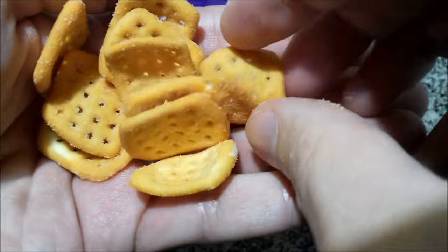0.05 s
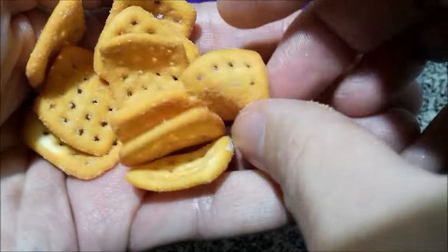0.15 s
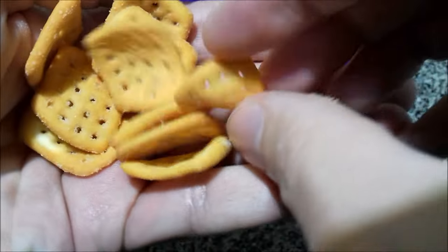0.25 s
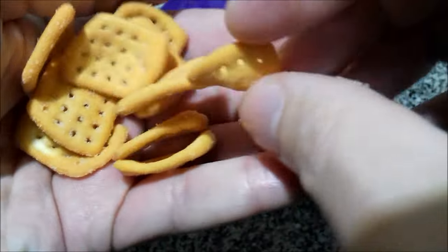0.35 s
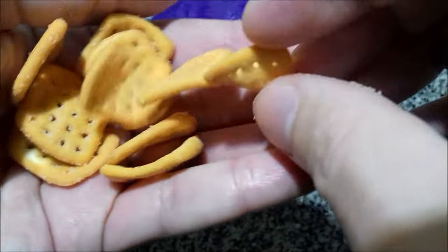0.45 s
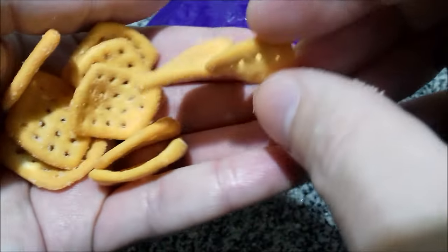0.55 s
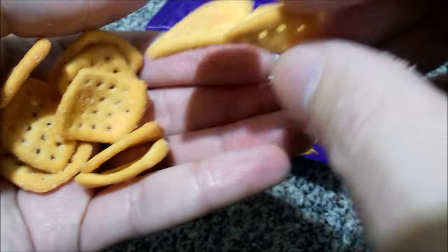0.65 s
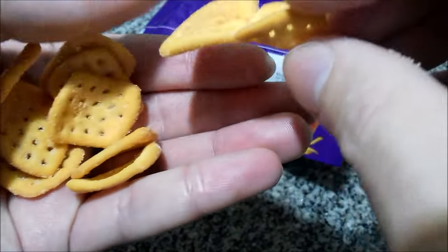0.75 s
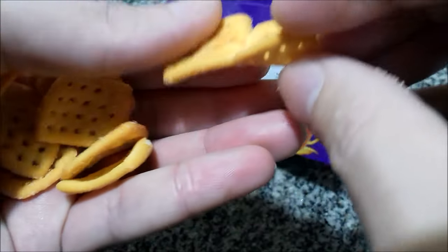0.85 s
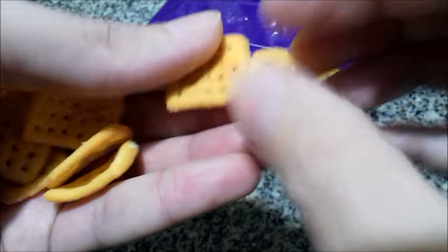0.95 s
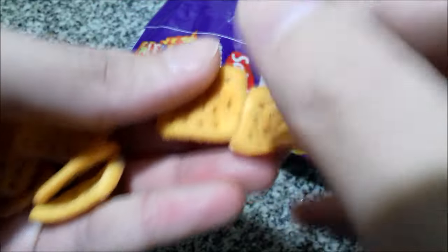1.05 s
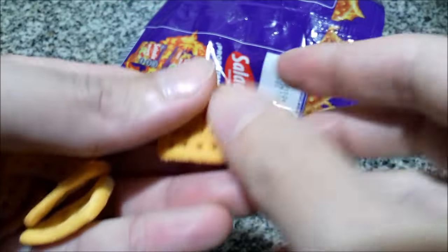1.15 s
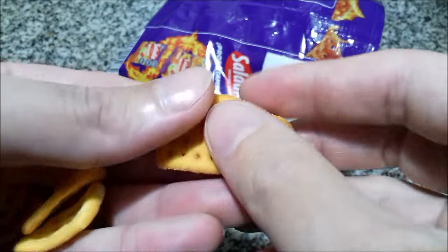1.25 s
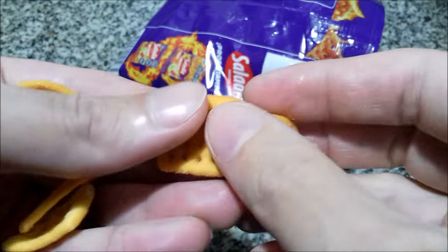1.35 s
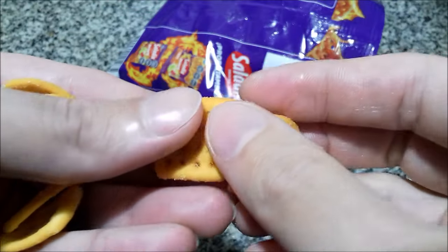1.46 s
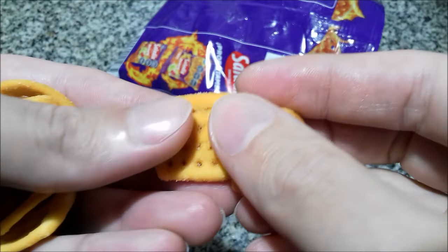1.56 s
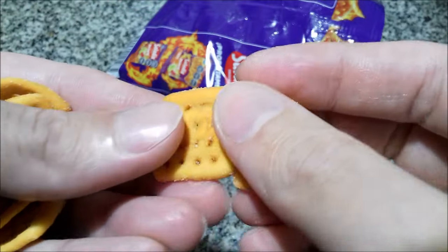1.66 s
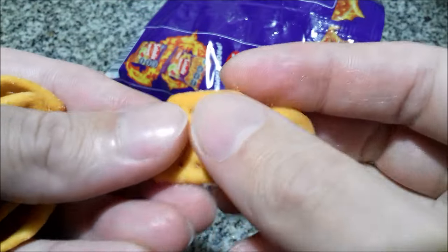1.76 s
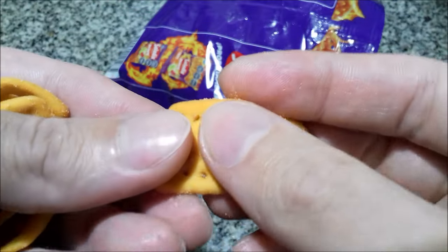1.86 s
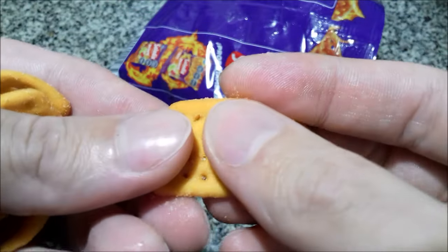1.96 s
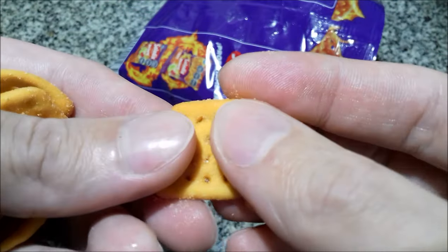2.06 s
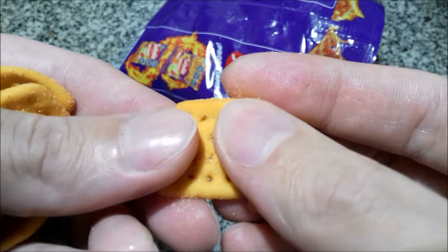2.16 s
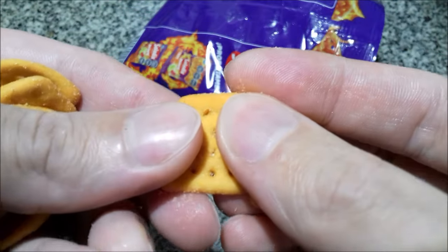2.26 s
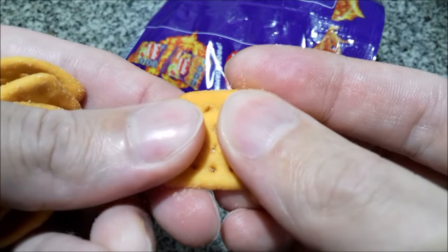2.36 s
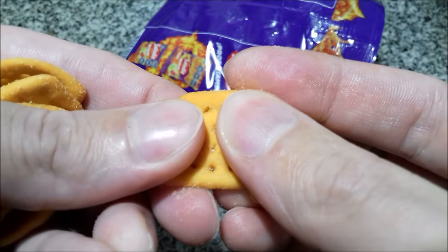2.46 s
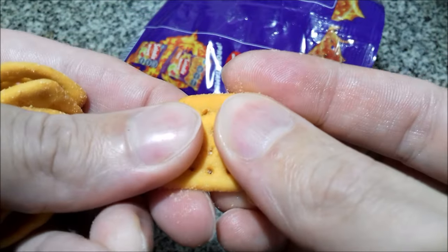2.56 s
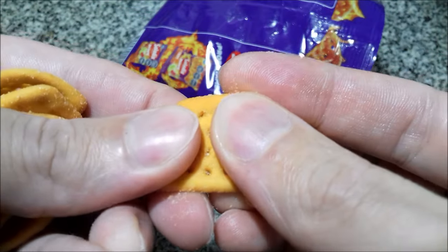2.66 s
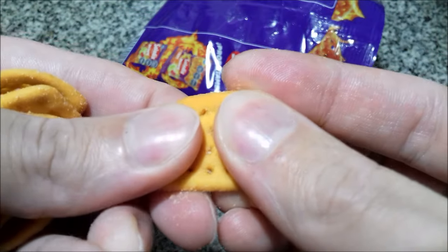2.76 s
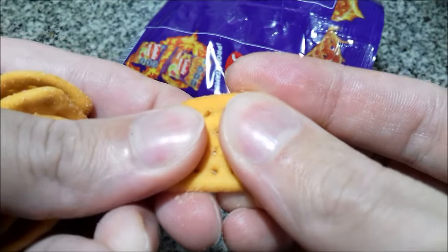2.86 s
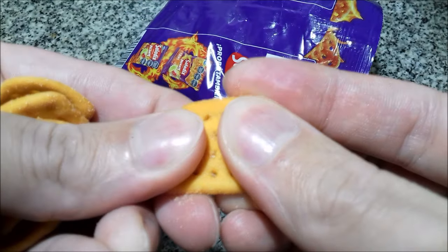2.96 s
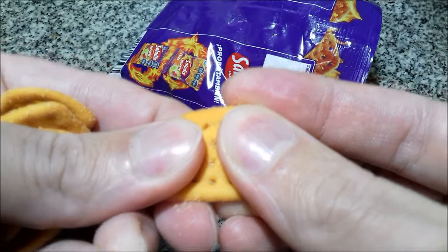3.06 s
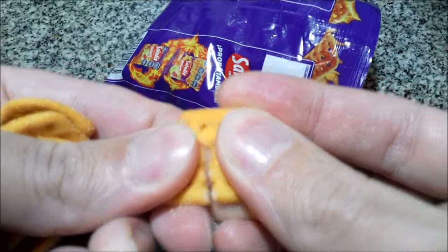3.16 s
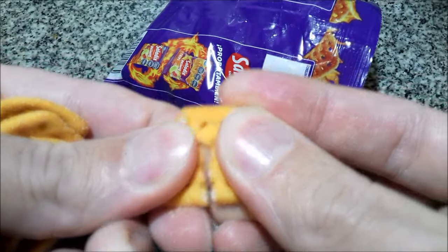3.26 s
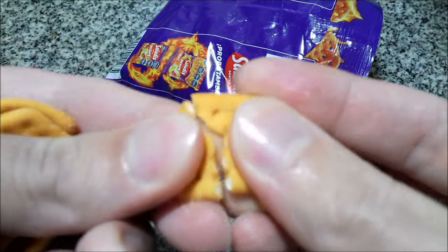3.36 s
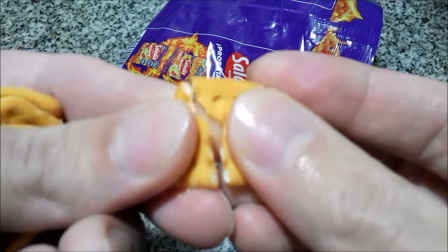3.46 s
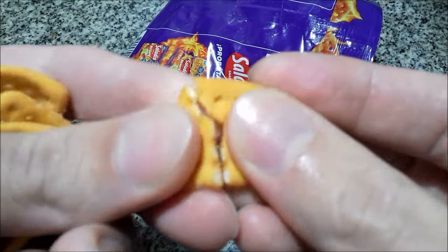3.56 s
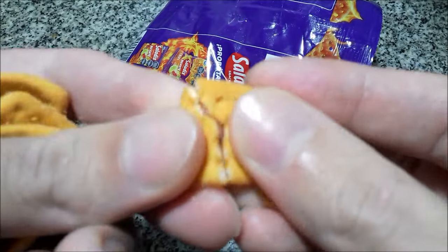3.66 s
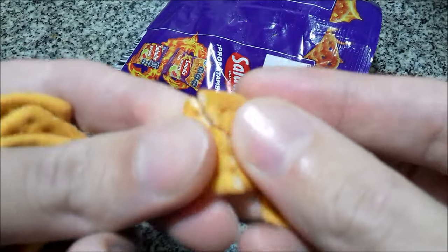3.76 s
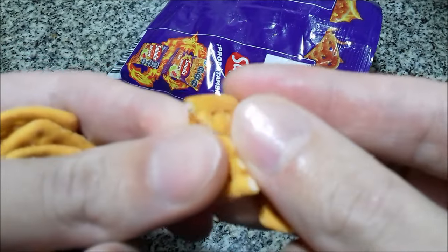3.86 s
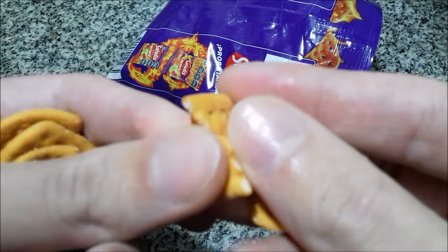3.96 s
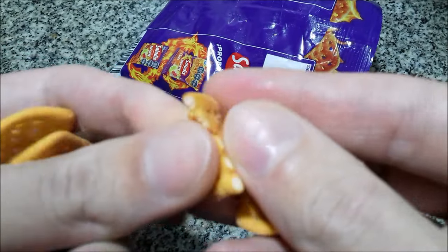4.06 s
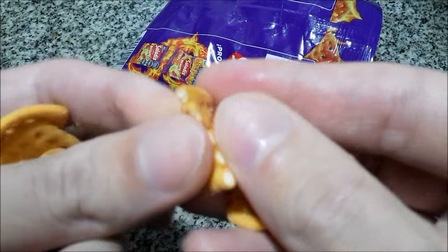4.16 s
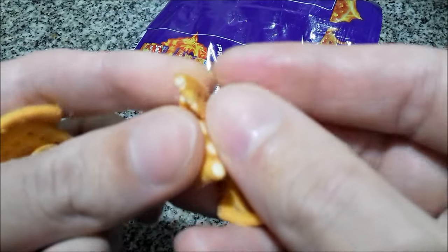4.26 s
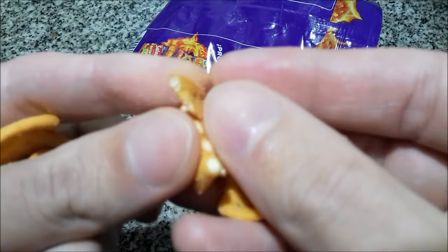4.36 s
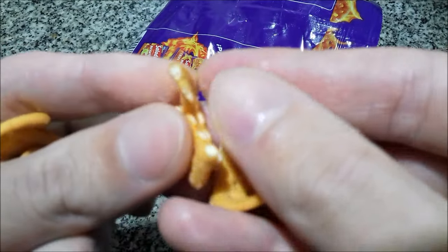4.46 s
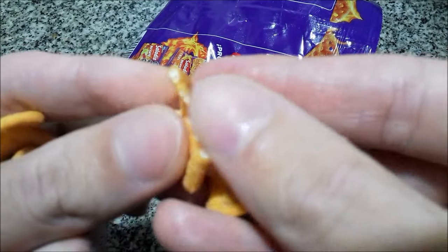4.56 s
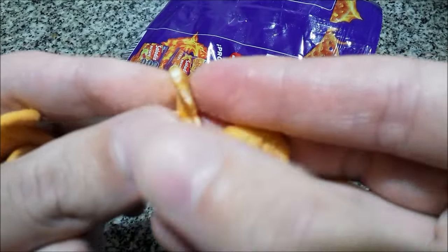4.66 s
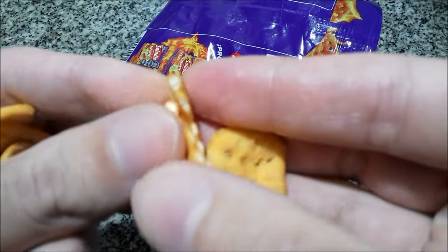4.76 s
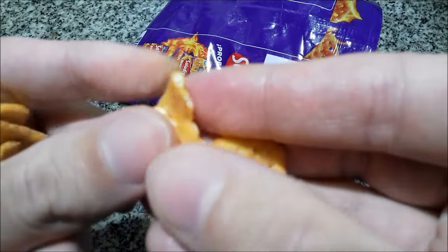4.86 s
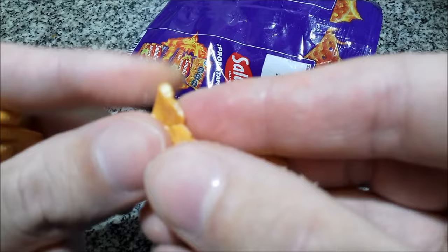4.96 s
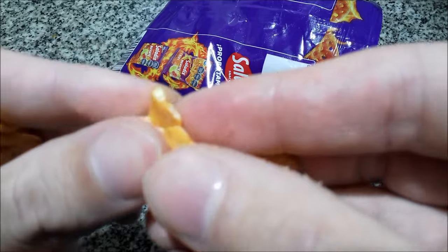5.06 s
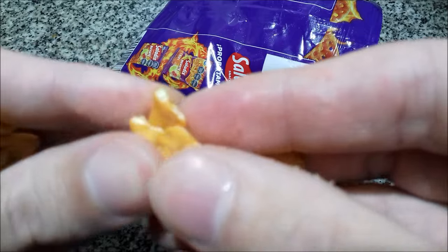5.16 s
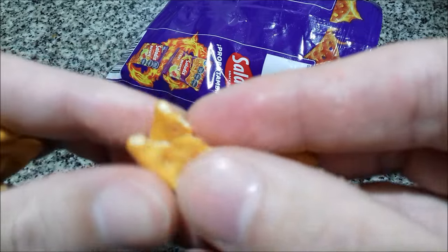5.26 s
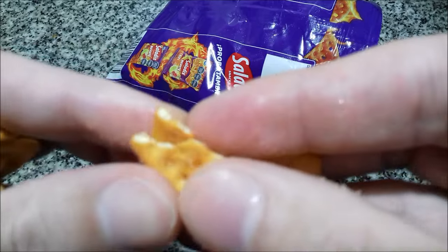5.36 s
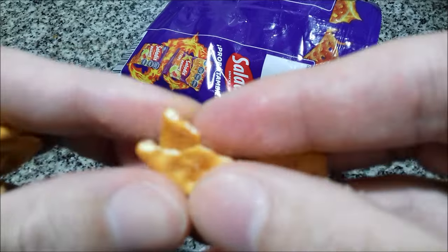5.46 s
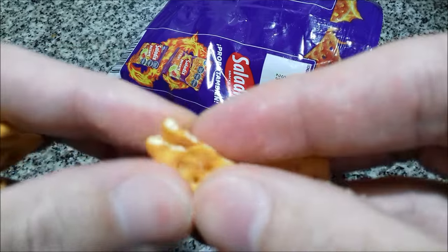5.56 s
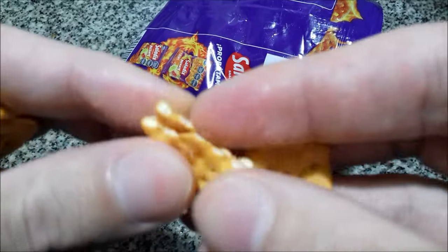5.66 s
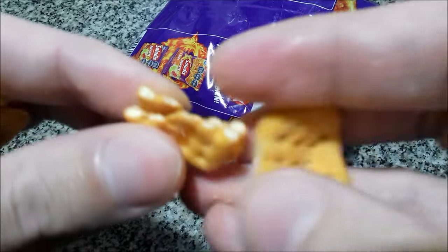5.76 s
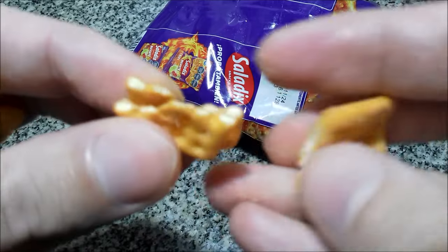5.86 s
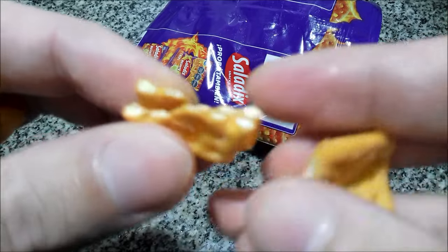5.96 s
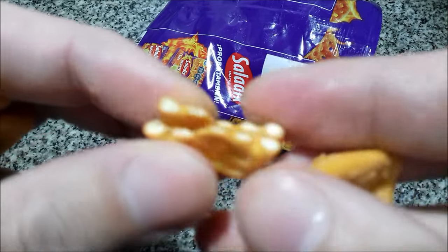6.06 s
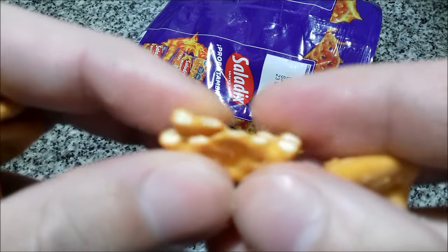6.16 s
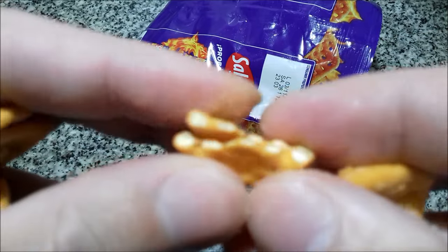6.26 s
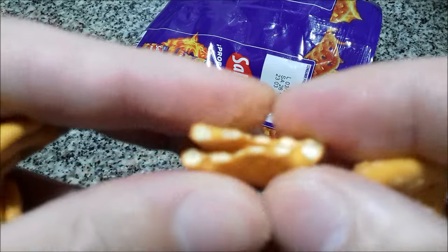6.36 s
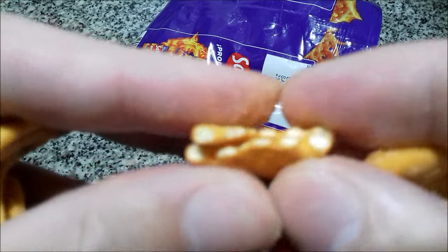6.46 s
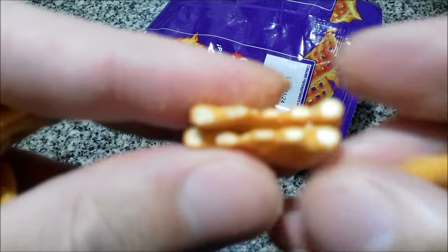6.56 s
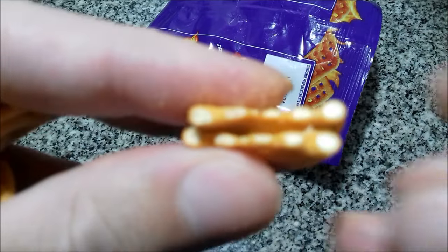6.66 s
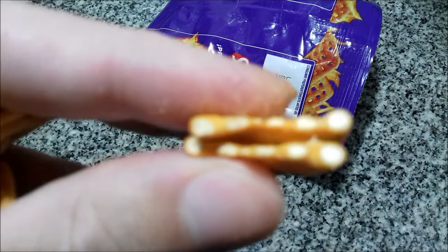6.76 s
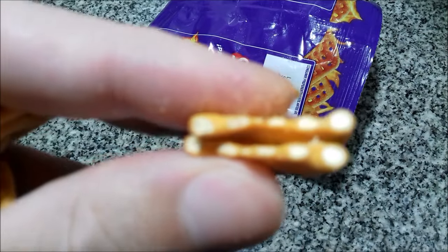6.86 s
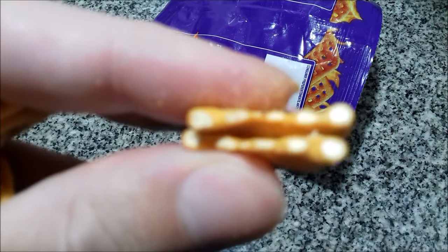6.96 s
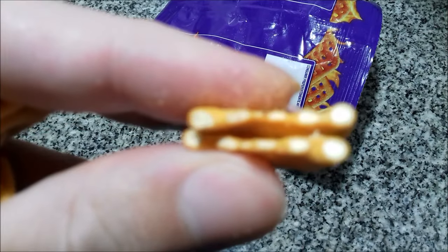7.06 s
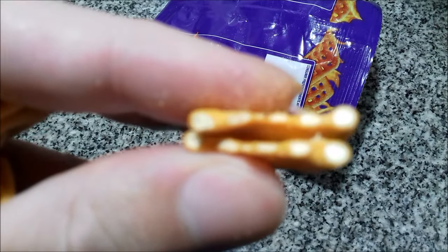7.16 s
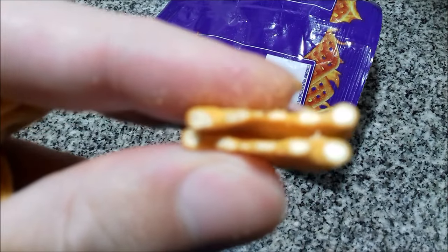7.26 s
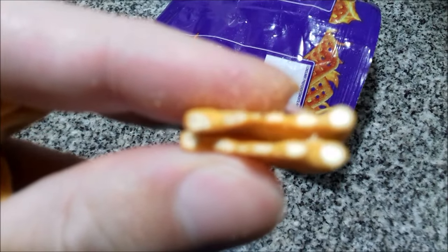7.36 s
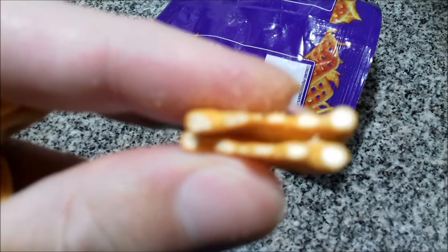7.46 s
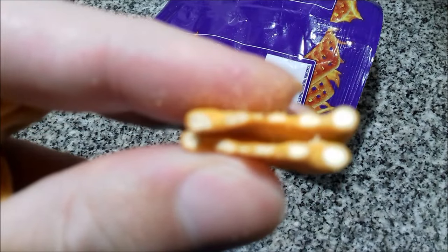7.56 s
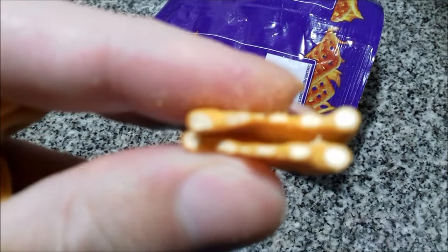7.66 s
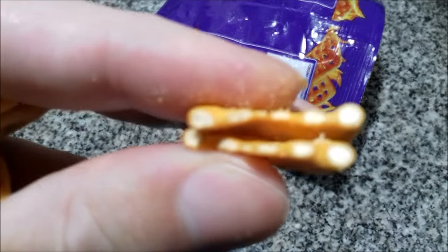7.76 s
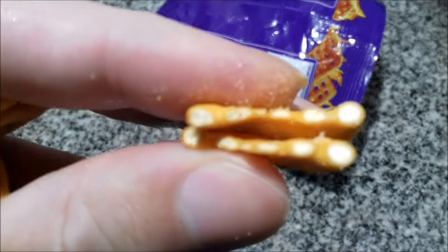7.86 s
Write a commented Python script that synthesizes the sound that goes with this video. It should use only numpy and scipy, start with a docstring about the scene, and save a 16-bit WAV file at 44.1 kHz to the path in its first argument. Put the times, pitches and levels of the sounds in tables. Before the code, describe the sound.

A dry cracker is rubbed between fingers, snaps once loudly, then crumbles in small crackles and ticks over a faint refrigerator hum and whine.

```python
"""A small hard kitchen: fingers pick up, snap and crumble a dry cracker close to a small camera microphone.
Each snap is a quick run of tiny random fractures; rubbed crumbs are dense clicks, filtered by crumb size.
The walls answer both with decaying noise tails. Behind, a refrigerator compressor hums and whines as
wavering sines, faint chirps swell in a narrow band of noise, and shaped noise gives the room air and
the hiss of the two channels."""
import sys
import numpy as np
from scipy import signal
from scipy.fft import rfft, irfft, next_fast_len
from scipy.io import wavfile
from scipy.ndimage import map_coordinates

SR = 44100
rng = np.random.default_rng(int(sys.argv[2]) if len(sys.argv) > 2 else 0)


def dump(signal):
    """Clip the signal to [-1, 1] and save it as 16-bit WAV at the path in sys.argv[1]."""
    limited = np.clip(np.atleast_2d(signal).T, -1, 1)
    pcm = np.round(limited * 32767).astype(np.int16)
    wavfile.write(sys.argv[1], SR, pcm)


N = 348390


def amp(db):
    """Amplitude factor of a level in dB."""
    return 10 ** (np.asarray(db) / 20)


def unit(x):
    """x scaled to an rms of 1."""
    return x / np.sqrt(np.mean(x ** 2) + 1e-20)


def along(points, hz):
    """Interpolate (f/Hz, value) points on a log frequency axis."""
    f, v = np.transpose(points)
    return np.interp(np.log(hz + 1), np.log(f + 1), v)


def curves(rows):
    """One value per sample for each column after the time."""
    times, *columns = np.transpose(rows)
    return [np.interp(np.arange(N) / SR, times, column) for column in columns]


def wobble(rate):
    """A smooth random curve, rate knots a second."""
    knots = rng.standard_normal(int(N * rate / SR) + 4)
    return map_coordinates(knots, [np.arange(N) * rate / SR])


def filtered(x, gain):
    """x times a gain that depends on frequency."""
    m = next_fast_len(N + 8192)  # zeros behind the sound keep its end off its start
    spectrum = rfft(x, m) * gain(np.fft.rfftfreq(m, 1 / SR))
    return irfft(spectrum, m)[..., :N]


def impulse(db_at, size=1024):
    """The causal response with gain db_at(Hz), by folding the cepstrum."""
    log_gain = db_at(np.fft.rfftfreq(size, 1 / SR)) * np.log(10) / 20
    cepstrum = irfft(log_gain, size)
    cepstrum[1:size // 2] *= 2
    cepstrum[size // 2 + 1:] = 0
    return irfft(np.exp(rfft(cepstrum)), size)


def shelf(hz, edge_hz):
    """A smooth step over frequency: 0 below the edge, 1 above it."""
    return 1 / (1 + (edge_hz / (hz + 1)) ** 8)


def air():
    """Steady room noise, alike in both channels, plus a weaker hiss of opposite sign in the two."""
    # spectrum of the room air: f/Hz, relative level/dB per Hz
    air_shape = [(12, -35), (20, -13.5), (70, -19.5), (105, -5), (200, -10.5), (500, -9.5), (1150, -15),
                 (1500, -10), (2000, -15.5), (2400, -24), (2900, -11.5), (3800, -17), (4540, -10),
                 (5300, -29), (9000, -32), (16000, -33.5)]
    # spectrum of the noise that differs between the channels: f/Hz, relative level/dB per Hz
    hiss_shape = [(35, -43), (60, -6), (256, -3.5), (803, -5.5), (1010, -5), (4030, -10), (16000, -21)]
    both, apart = rng.standard_normal((2, N))
    both = amp(-64.5) * unit(filtered(both, lambda hz: amp(along(air_shape, hz))))
    apart = amp(-72) * unit(filtered(apart, lambda hz: amp(along(hiss_shape, hz))))
    return np.array([both + apart, both - apart])


def compressor():
    """Hum and whine: sines on multiples of the shaft rate, each wavering a little in level."""
    # steady tones: multiple of the shaft rate, level/dB rms before the wavering
    hum_tones = [(2, -87), (3, -83), (6, -86), (7, -79), (8, -86), (10, -87), (11, -74), (59, -80),
                 (85, -81), (86, -84), (91, -83), (92, -85), (94, -83), (95, -83), (96, -78)]
    # the 93rd multiple swells and fades: t/s, level/dB rms before the wavering
    whine_level = [(0, -61.5), (.75, -65), (1.1, -71.5), (1.9, -73.5), (2.2, -67), (3.6, -71), (4.6, -65),
                   (5.3, -69), (6.1, -69), (6.6, -66), (7, -61.5), (7.2, -65.5), (7.5, -58.5),
                   (7.75, -72.5), (7.9, -63.5)]
    shaft_hz = 49.028
    turn = 2 * np.pi * shaft_hz * np.arange(N) / SR

    def tone(order):
        """A sine of rms 1 from a random phase."""
        return np.sqrt(2) * np.sin(order * turn + 2 * np.pi * rng.random())

    hum = sum(amp(db + .8 * wobble(3)) * tone(order) for order, db in hum_tones)
    whine_db = curves(whine_level)[0] + 2.2 * wobble(9)
    return hum + amp(whine_db) * tone(93)


def chirps():
    """A narrow band of noise near 2.9 kHz that murmurs all along and swells now and then for some 50 ms."""
    # faint short chirps: t/s of the middle, level/dB rms added to the murmur
    swells = [(1.81, -62.5), (1.92, -65), (2.3, -65), (4.55, -62.5), (5.53, -71), (6.58, -61), (6.87, -67),
              (7.32, -69), (7.42, -66.5), (7.66, -67)]
    t = np.arange(N) / SR
    murmur_db = -80 + 3 * wobble(14)
    level = amp(murmur_db) + sum(amp(db) * np.exp(-((t - s) / 0.026) ** 2) for s, db in swells)
    band = filtered(rng.standard_normal(N), lambda hz: 1 / (1 + ((hz - 2930) / 90) ** 2))
    return level * unit(band)


def ringing(hz):
    """The lift in dB that the modes of the piece give: the cracker rings faintly."""
    # modes: f/Hz, half width/Hz, lift/dB
    modes = [(2018, 100, 9), (5873, 45, 8), (6560, 130, 4.5), (9470, 340, 1.5), (11700, 210, 1)]
    return sum(db / (1 + ((hz - centre) / width) ** 2) for centre, width, db in modes)


def strokes():
    """Gains of body, middle and treble of the grit: each stroke rises, sags while it lasts and falls."""
    # the faint grit of simply holding the piece: t/s, level/dB
    grip = [(0, -72), (.8, -68.5), (1.3, -68.5), (1.85, -63.5), (2.3, -67.5), (3.0, -64.5), (4.25, -64.5),
            (5.2, -66.5), (5.6, -67.5), (6.4, -68), (6.9, -70.5), (7.9, -74)]
    # fingers over the crumbs: start t/s, length/s, level/dB, treble/dB, body/dB (the last two relative)
    finger_strokes = [(0, 0.046, -62.5, -2, -18), (0.19, 0.066, -61, -6, -9), (0.362, 0.13, -56, 1, -9),
                      (0.566, 0.1, -62.5, 0, -2), (1.057, .04, -63.5, 5, 1), (1.178, 0.026, -60, 4, -4),
                      (1.326, .03, -60.5, -11, -4), (1.38, 0.032, -59, 4.5, -3), (1.475, 0.023, -68, 11, 6),
                      (2.103, 0.04, -66, -2, 4), (2.34, 0.36, -67, 3.5, 5.5),
                      (3.224, 0.26, -57.5, -4, -0.5), (3.55, 0.15, -55, 5.5, 4.5),
                      (3.845, 0.14, -54.5, 5, 3.5), (3.96, 0.073, -57.5, 7, -6),
                      (4.072, 0.11, -59.5, 8, 4.5), (4.42, 0.091, -74, 13, 4), (4.684, 0.03, -65.5, 5, -3),
                      (4.945, 0.066, -59, 4, -5), (5.043, 0.03, -65.5, 13, -3),
                      (5.083, 0.027, -57.5, 5.5, -9), (5.687, 0.06, -62.5, 7.5, -3),
                      (5.833, 0.054, -60, 4, -7), (5.934, .12, -65, 5, -3), (6.5, 0.11, -63, -3, 0)]
    grip_body_db, grip_treble_db = 1.5, -4
    rise, sag, fall = 450, 10.5, 230  # dB per s before, during and after a stroke
    t = np.arange(N) / SR
    gains = amp(curves(grip)[0] + np.array([[grip_body_db], [0], [grip_treble_db]]))
    for s, length, db, treble_db, body_db in finger_strokes:
        loss_db = rise * np.maximum(s - t, 0)
        loss_db += sag * np.clip(t - s, 0, length)
        loss_db += fall * np.maximum(t - s - length, 0)
        stroke = amp(db - loss_db) * amp([[body_db], [0], [treble_db]])
        gains = np.hypot(gains, stroke)  # powers add
    return gains


def rubbing(per_second=2000, spread_db=3.8):
    """Dense grit in clumps; crumbs of each size click on their own in their own range, so the colour shifts."""
    # spectrum of the crumbs: f/Hz, relative level/dB per Hz
    grit_shape = [(900, -47.5), (1700, -20.5), (2100, -18.5), (3700, -8), (4500, -0.5), (5200, -11.5),
                  (7300, -24), (10000, -31), (16000, -43)]
    # edges of the ranges of crumb sizes: f/Hz
    edges_hz = [1500, 2800, 3900, 5200, 6300, 7400, 8800, 10500, 17000]
    body, middle, treble = strokes()
    sizes = len(edges_hz) - 1
    hit = rng.random((sizes, N), np.float32) < per_second / SR
    # one slow clumping per size, and a faster one that all sizes share
    clumps_db = 2.4 * wobble(120) + 2.3 * np.array([wobble(25) for _ in range(sizes)])
    click_db = spread_db * rng.standard_normal((sizes, N), np.float32) + clumps_db
    clicks = hit * rng.standard_normal(N) * amp(click_db)
    colour = impulse(lambda hz: along(grit_shape, hz) + ringing(hz))
    grit = signal.fftconvolve(clicks, colour[None], axes=1)[:, :N]
    # each size keeps only the range between its two edges
    crumbs = filtered(grit, lambda hz: -np.diff([shelf(hz, edge) for edge in edges_hz], axis=0))
    crumbs /= np.std(crumbs.sum(axis=0))
    return body * crumbs[0] + middle * crumbs[1:4].sum(axis=0) + treble * crumbs[4:].sum(axis=0)


def kitchen(x, size=SR // 4):
    """Hard walls answer after a few ms; each frequency dies at its own speed, a new tail every quarter second."""
    # decay of the room: f/Hz, time to fall by 60 dB/s
    decay = [(400, 0.25), (900, 0.16), (1500, 0.19), (3400, 0.21), (4500, 0.24), (6000, 0.24),
             (12000, 0.29)]
    out = np.zeros(N + 4 * size)
    for start in range(0, N, size):
        hz, t, noise = signal.stft(rng.standard_normal(2 * size), SR, nperseg=256)
        fading = noise * amp(-60 * t / along(decay, hz)[:, None])
        tail = signal.istft(fading, SR, nperseg=256)[1]
        wet = signal.fftconvolve(x[start:start + size], tail / np.linalg.norm(tail))
        out[start + 250:][:len(wet)] += wet  # 250 samples: the way to the walls and back
    return out[:N]


def snaps(count=70):
    """Each snap is a crack front that jumps from cell to cell of the brittle dough: it starts fast and runs out."""
    # snaps and ticks: t/s, peak level/dB, treble/dB, body/dB, run length/ms (at least 1 is used)
    cracks = [(0.391, -44, -14, 0, 4.3), (0.4155, -41, 6, 5, 2.6), (0.596, -48, -8, -3, 2.3),
              (0.626, -38, 7, 4, 7), (1.0795, -42.5, -3, -24, 12.3), (1.377, -39.5, -8, -13, 5.9),
              (1.3885, -36, -4, 11, 6.5), (2.013, -42, -2, 13, 4), (2.1221, -40, -1, 14, 4),
              (2.307, -44, -8, 9, 3.9), (2.3351, -45.5, -1, 9, 3.2), (2.488, -46, -3, 29, 4),
              (2.541, -39.5, 3, 19, 4), (2.615, -40.5, -5, 7, 3.6), (2.723, -18, 1, -1, 3),
              (2.7254, -24.5, -6, 0, 7), (2.852, -43.5, 5, 10, 3.1), (2.9688, -50.5, 3, 12, 3),
              (3.168, -39, -5, 4, 4.4), (3.2634, -8, 9, 6.5, 2.79), (3.2652, -15.5, 5, 2, 3.64),
              (3.2679, -14.5, -11, -20, 3.9), (3.3804, -36.5, 1, 10.5, 6), (3.504, -32, 0.5, 13, 5),
              (3.5522, -26.5, -6, -2, 17), (3.561, -29.5, -6, 14, 9), (3.574, -35.5, 3, 17, 9.7),
              (3.616, -37, 7, 17, 4.1), (3.6225, -34, 4, 1, 4.5), (3.6622, -37, -12, -1, 4.4),
              (3.7259, -28, 5, 20, 6.25), (3.7775, -33.5, 7, 17, 2.3), (3.784, -36.5, 8, 10, 6),
              (3.8113, -46, 10, 2, 3), (3.8447, -47, -3, 17, 3), (4.037, -40, -16, -8, 2),
              (4.055, -43, -13, -2, 2.4), (4.157, -42, -4, -3, 2), (5.127, -46, 0, -5, 2.2),
              (5.221, -42.5, -5, -13, 1.1), (5.445, -40.5, 5.5, 0, 3), (5.7186, -38.5, 2, 1, 5.4),
              (5.8044, -40.5, -4, -9, 4), (5.8608, -40, -11, 0, 4.8), (5.867, -42.5, 1, -5, 24),
              (5.94, -39, -1, -15, 4.9), (5.9543, -41, 1, -12, 4), (5.9607, -37.5, -6, -4, 4.3),
              (5.9885, -43, 6, -6, 2), (6.0107, -32, -1.5, -9, 6.9), (6.028, -51, 7, 2, 7),
              (6.402, -43.5, 0, -1, 2.7), (6.6188, -46.5, 3, 4, 1.56), (6.7411, -38.5, -45, 1, 1.24),
              (7.223, -49, 11, 3, 2.1)]
    # spectrum of a fracture, as the microphone port colours it: f/Hz, relative level/dB per Hz
    crisp_shape = [(60, -53), (220, -29), (370, -36), (700, -19), (1100, -17.5), (2000, -17), (3120, -15.5),
                   (4020, -4), (4670, 2.5), (6700, -19), (8200, -22.5), (10500, -32), (13000, -30),
                   (16000, -33)]
    lead_s = .001  # the crack gathers for this long before the main break
    out = np.zeros((2, N + SR))  # as heard close by, and as sent to the walls
    draws = rng.random((len(cracks), 2, count))
    for (s, db, treble_db, body_db, run_ms), (when, strength) in zip(cracks, draws):
        run_s = max(run_ms, 1) / 1000
        t = (lead_s + run_s) * when
        gathering = np.minimum(t / lead_s, 1) ** 2
        running_out = amp(-13 * np.maximum(t - lead_s, 0) / run_s)
        fractures = (1.74 * strength - .65) * gathering * running_out
        jumps = np.pad(np.bincount((t * SR).astype(int), fractures), (0, 64))
        jumps -= jumps.mean()  # the fractures push both ways
        jumps[round(lead_s * SR)] += max(0.054 * (db + 43.5), 0)  # a harder snap has a clearer main break
        thud_db = 1.77 * (db + 13.5)  # only hard snaps bend the whole piece and sound low

        def tilt(hz):
            """Treble, body and thud of this snap, in dB."""
            body = body_db * (shelf(hz, 1820) - shelf(hz, 3330))
            return treble_db * shelf(hz, 6300) + body + thud_db * (1 - shelf(hz, 1230))

        colour = impulse(lambda hz: along(crisp_shape, hz) + ringing(hz) + tilt(hz))
        snap = np.convolve(jumps, colour)
        gain, start = amp(db) / np.abs(snap).max(), round(s * SR)
        out[0, start:][:len(snap)] += gain * snap
        # the walls blend the run into one even crack
        out[1, start:][:len(colour)] += gain * np.linalg.norm(jumps) * colour
    return out[:, :N]


def scene():
    """The cracker close by, its echo off the kitchen walls 6 dB down, and the background."""
    near, around = snaps()
    grit = rubbing()
    room = amp(-6.0) * kitchen(around + grit)
    return near + grit + room + compressor() + chirps() + air()


def record(dry):
    """The camera keeps nothing above its band limit and sits slightly below zero."""
    top_hz, offset = 15750, -.0005
    return filtered(dry, lambda hz: hz < top_hz) + offset


dry = scene()
out = record(dry)
dump(out)
```